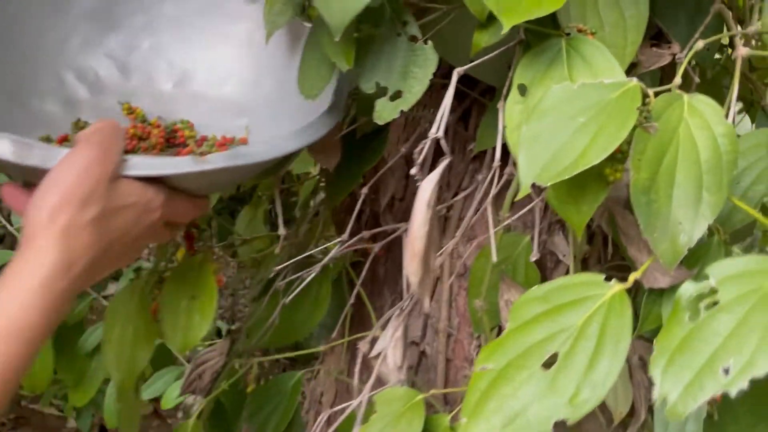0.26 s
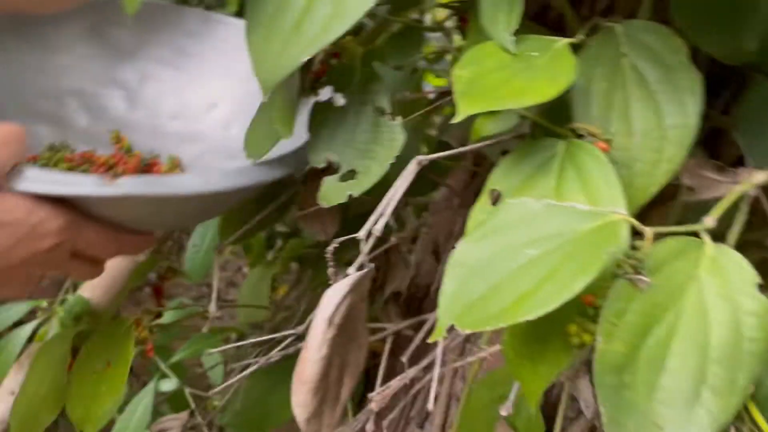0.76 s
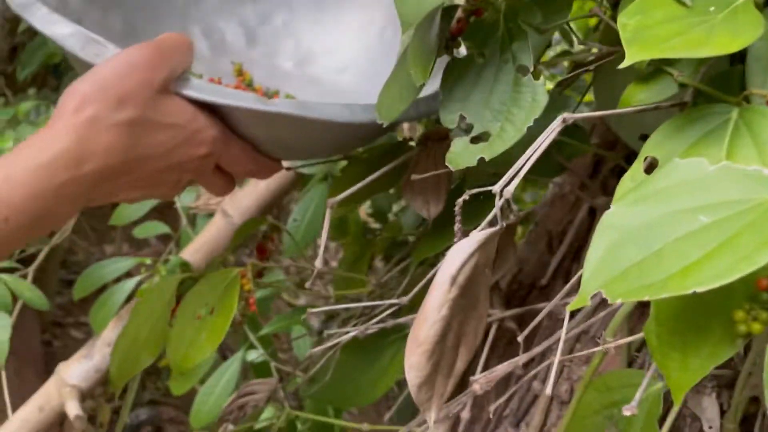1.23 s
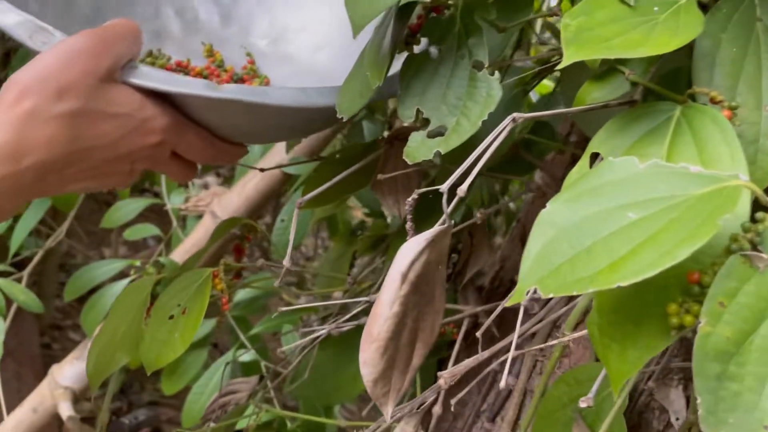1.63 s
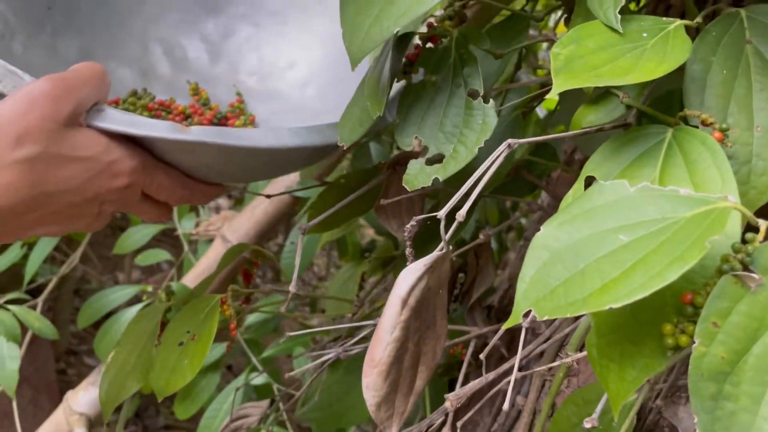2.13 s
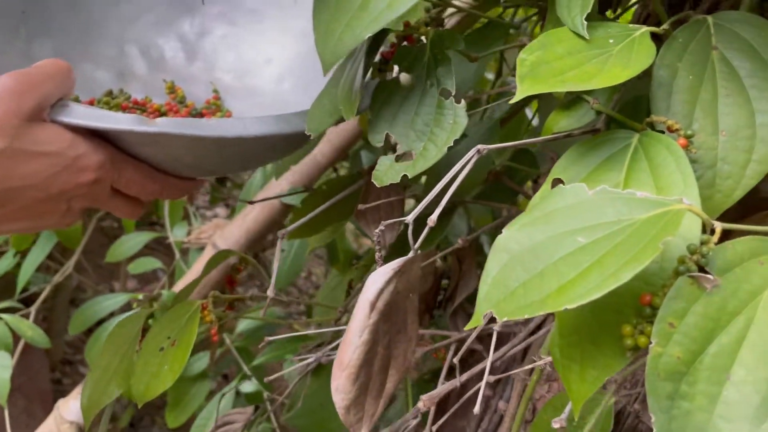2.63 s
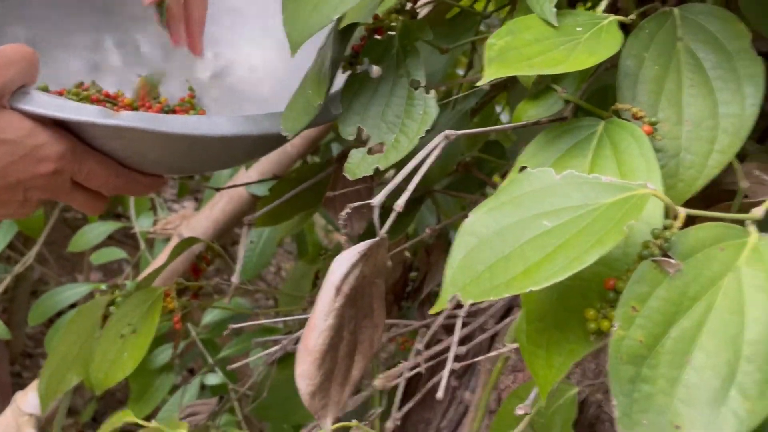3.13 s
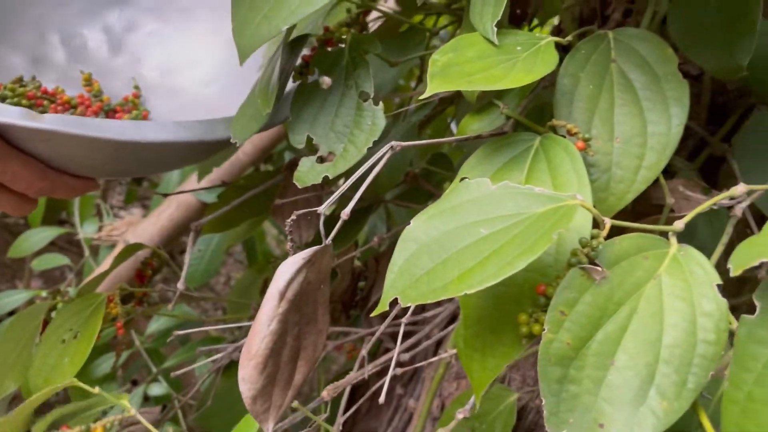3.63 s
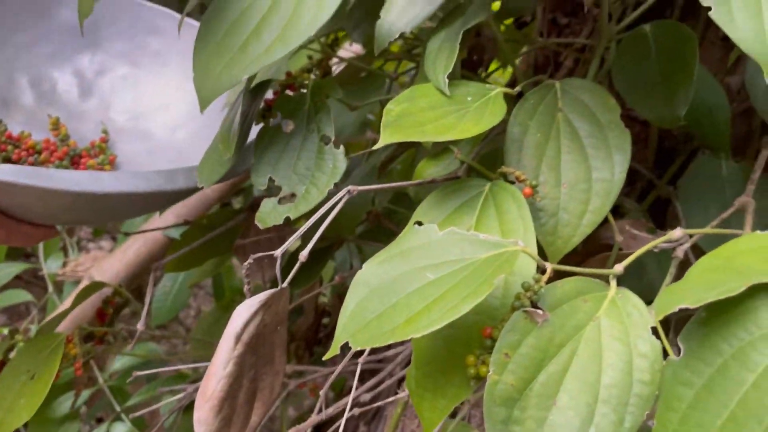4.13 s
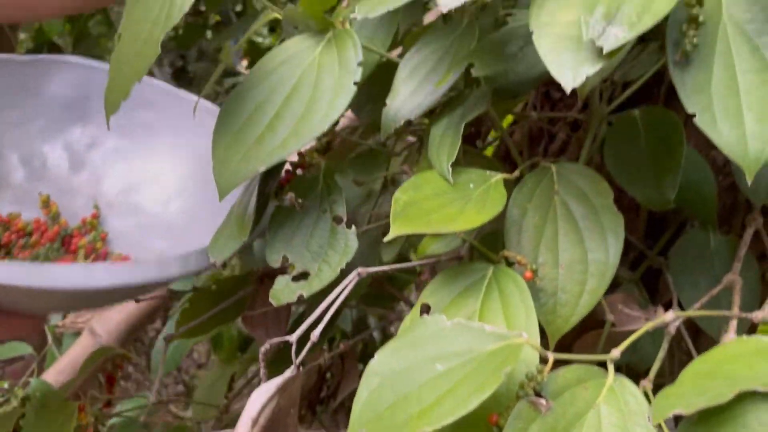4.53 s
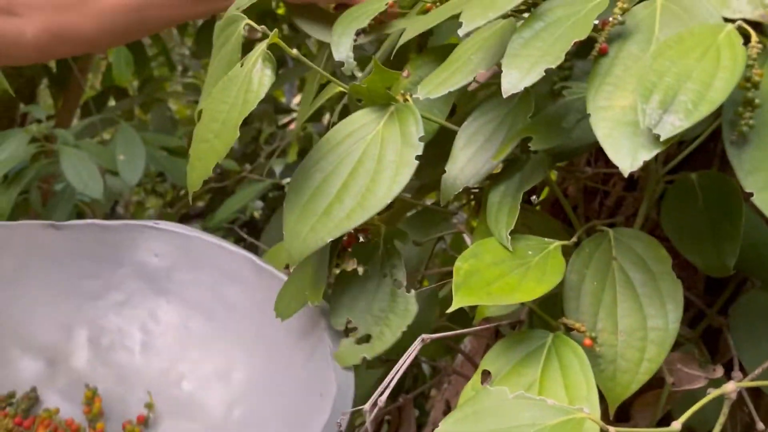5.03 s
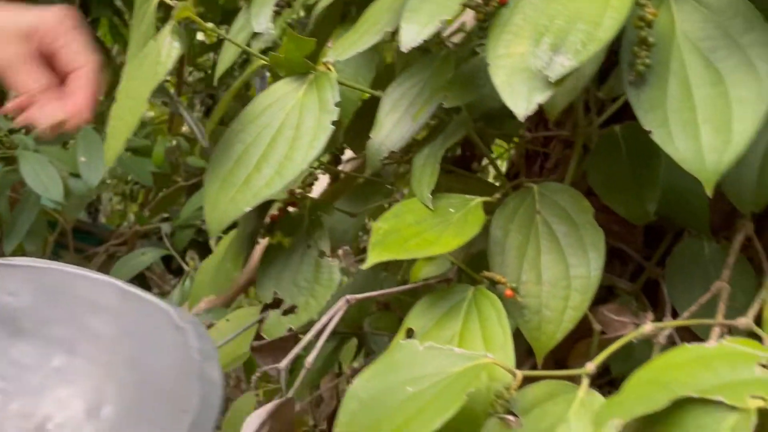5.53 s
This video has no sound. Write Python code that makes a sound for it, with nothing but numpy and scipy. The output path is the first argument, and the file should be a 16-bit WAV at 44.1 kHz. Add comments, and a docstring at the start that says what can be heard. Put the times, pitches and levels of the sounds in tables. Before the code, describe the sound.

Chicks peep constantly and a hen clucks softly in a leafy yard while stalks snap sharply and berries roll in a thin metal bowl.

```python
"""From the start chicks peep and a hen clucks (gliding near-sines and harmonic notes) in a leafy yard, over
an insect hiss and a far engine's hum (filtered noise and firing tones). Leaves rustle (noise) and berries
roll in a thin metal bowl (excited modes). From about 0.6 s stalks and twigs snap (band-filtered bursts);
a jolt thumps at 1 s and one chick calls upward at 1.7 s. The picking is densest from 2.5 to 3.3 s, then
sparser snaps follow; around 5 s the bowl is tapped and berries roll again."""
import sys
import numpy as np
from scipy import signal
from scipy.fft import rfft, irfft
from scipy.io import wavfile

SR = 44100
rng = np.random.default_rng(int(sys.argv[2]) if len(sys.argv) > 2 else 0)


def store_wav(level_fs):
    """Save 16-bit WAV to argv[1]."""
    pcm = np.round(np.clip(np.atleast_2d(level_fs), -1, 1) * 32767)
    wavfile.write(sys.argv[1], SR, pcm.T.astype(np.int16))


N = 254016


def from_db(db):
    """Level to amplitude: 20 dB is a factor of ten."""
    return 10 ** (np.asarray(db) / 20)


def rms_one(x):
    """Normalisation to unit effective value."""
    return x / np.sqrt(np.mean(x ** 2) + 1e-20)


def in_time(rows):
    """Linear interpolation: each column of a time table read at every sample."""
    s, *columns = np.transpose(rows)
    return [np.interp(np.arange(N) / SR, s, c) for c in columns]


def at_hz(points, left=None, right=None):
    """Interpolation on a logarithmic frequency axis: an (f/Hz, value) table read at every bin."""
    bin_hz = np.maximum(np.arange(N // 2 + 1) * SR / N, 1)
    table_hz, values = np.array(points).T
    return np.interp(np.log(bin_hz), np.log(table_hz), values, left, right)


def sides(pan_db):
    """Level-difference stereo: gains of left and right, half the difference each."""
    return from_db(np.array([[.5], [-.5]]) * pan_db)


def add(out, s, piece):
    """Superposition: mix a piece in at time s."""
    i = max(round(s * SR), 0)
    out[..., i:i + piece.shape[-1]] += piece[..., :max(N - i, 0)]


def drift(rate):
    """Low-passed random process of spread 1; rate is the corner of its two poles in Hz."""
    r = np.exp(-80 * np.pi * rate / SR)   # one step is 40 samples
    chance = rng.standard_normal(N // 40 + 2002)
    slow = signal.lfilter([1], [1, -2 * r, r * r], chance)[2000:]
    return np.interp(np.arange(N) / 40, np.arange(len(slow)), rms_one(slow))


# phase between the two microphone ports: f/Hz, lag of the right port/rad (negative: it leads)
PORT_PHASE = [(100, 0.3), (5700, 0.4), (6700, -.9), (7700, -2.9), (8900, -3.3), (10400, -5.4),
              (11900, -6.3), (13000, -7.2), (14000, -9.2), (16400, -9.5)]


def shift_right_port(pair):
    """Interaural-like phase difference: the right spectrum is turned against the left."""
    pair[1] *= np.exp(-1j * at_hz(PORT_PHASE))
    return pair


# coherence of the background at the two ports: f/Hz, likeness/(0-1)
COHERENCE = [(60, 1), (130, 0.96), (300, 0.012), (1400, 0.014), (3000, 0.83), (6800, 0.41), (7800, 1),
             (16000, 0.83)]


def coloured(spectrum, grain_db=0):
    """Spectral shaping of partly coherent stereo noise to rms 1; quick level grain makes it crackle."""
    mid, side = rfft(rng.standard_normal((2, N)) * from_db(grain_db * drift(137)))
    alike = np.clip(at_hz(COHERENCE), 0, 1)
    pair = np.sqrt(1 + alike) * mid + np.sqrt(1 - alike) * side * [[1], [-1]]
    pair = shift_right_port(pair)
    return rms_one(irfft(pair * from_db(at_hz(spectrum, left=-80, right=-80)), N))


# level of the hum noise: t/s, level/dB
HUM_LEVEL = [(0.0, -51.5), (3.77, -54.5), (5.76, -54.5)]
# relative spectrum of the hum noise: f/Hz, density/(dB per Hz)
HUM_SPECTRUM = [(15, -57), (32, -13), (70, 4), (102, 8), (146, 1), (211, -5), (300, -7), (390, -8.5),
                (660, -120)]


def hum():
    """Broadband low-frequency noise: the untuned part of the background hum."""
    return from_db(in_time(HUM_LEVEL)[0]) * coloured(HUM_SPECTRUM)


# far engine: t/s, firing rate f/Hz, reference level of its tones/dB
ENGINE_RUN = [(0.0, 24.22, -58), (1.0, 27.33, -52), (1.7, 28.8, -55), (2.6, 29.36, -55.5),
              (3.6, 30.64, -60.5), (4.3, 29.88, -60.5), (4.8, 28.16, -64), (5.76, 28.25, -60.5)]
# harmonics of the firing rate: multiple, relative level/dB
ENGINE_HARMONICS = [(3, -9), (4, 1.5), (5, -0.5), (6, -8), (7, -8.5), (8, -12.5)]


def engine():
    """Harmonic series on the firing rate, each tone swelling and sinking on its way over the yard."""
    hz, db = in_time(ENGINE_RUN)
    phase = 2 * np.pi * np.cumsum(hz) / SR
    out = np.zeros(N)
    for k, order_db in ENGINE_HARMONICS:
        level_db = db + order_db + 2.3 * drift(1.15)
        out += from_db(level_db) * np.sin(k * phase + rng.uniform(0, 2 * np.pi))
    return out


# relative spectrum of the insect hiss: f/Hz, density/(dB per Hz)
INSECT_SPECTRUM = [(5800, -34), (6350, -6.5), (6700, 1.5), (7100, -9), (7800, -16)]


def insects(level_db=-64):
    """Narrow-band noise: a hiss whose level wavers a little."""
    return from_db(level_db + 1.04 * drift(3.3)) * coloured(INSECT_SPECTRUM)


# relative spectrum of far chicks blurred to noise: f/Hz, density/(dB per Hz)
FLOCK_SPECTRUM = [(1600, -20), (2100, -8), (2700, -2), (3400, 0), (4400, -1), (5200, -8), (5800, -22)]


def blurred_flock(level_db=-65):
    """Superposed calls merge into noise: far chicks as a strongly fluctuating band."""
    return from_db(level_db + 7.1 * drift(8.6)) * coloured(FLOCK_SPECTRUM)


def whistle(hz, level_db, flutter_db=3, beads_db=1.5, waver_hz=72):
    """Frequency and amplitude modulation: a near sine in beads, hoarser when low, soft at both ends."""
    length = len(hz) / SR
    t = np.linspace(0, 1, len(hz)) * length
    knots = rng.standard_normal((3, 120))
    wobble, flutter, beads = (np.interp(t * rate, np.arange(120), k)
                              for k, rate in zip(knots, (300, 400, 70)))   # knots per second
    hoarse_hz = waver_hz * (3500 / hz) ** 2.3 * wobble
    phase = 2 * np.pi * np.cumsum(hz + hoarse_hz) / SR
    ends = np.minimum(1, np.minimum(1.5 * t, length - t) / .012)
    return from_db(level_db + flutter_db * flutter + beads_db * beads) * ends * np.sin(phase)


def peep(length, hz_start, hz_end, level_db, bend, swell_db=3.3):
    """Frequency glide: the pitch moves as time to the power of the bend while the level swells."""
    u = np.linspace(0, 1, max(round(length * SR), 64))
    return whistle(hz_start + (hz_end - hz_start) * u ** bend, level_db + swell_db * (u - .5))


def through_leaves(call, t60_s=.08, spray_db=0):
    """Multiple scattering: leaves add a short spray of echoes, partly shared by the two sides."""
    t = np.arange(SR // 10) / SR
    shared, *own = rng.standard_normal((3, len(t))) * from_db(-60 * t / t60_s)
    spray = shared + .5 * np.array(own)
    spray *= from_db(spray_db) / np.sqrt(np.sum(spray ** 2, axis=1, keepdims=True))
    spray[:, 0] = 1   # the direct call
    return signal.fftconvolve(call[None], spray, axes=1)


def far_chicks(count=230, level_db=-63, bend=1.2):
    """Random superposition: the rest of the brood peeps behind the leaves, at chance moments."""
    out = np.zeros((2, N))
    for when, long, high, fall, loud in rng.random((count, 5)):
        hz = 2900 + 2300 * high
        call = peep(0.04 + 0.08 * long, hz, hz * (.8 - 0.3 * fall), level_db + 9 * (loud - .5), bend)
        add(out, when * N / SR, through_leaves(call))
    return out


def yard(x, t60_s=.28, build_up_s=.02):
    """Diffuse reverberation: leaves, trunks and walls scatter a dying echo cloud, another to each side."""
    t = np.arange(SR // 2) / SR
    cloud = rng.standard_normal((2, len(t))) * from_db(-60 * t / t60_s) * np.clip(t / build_up_s, 0, 1)
    cloud /= np.sqrt(np.sum(cloud ** 2, axis=1, keepdims=True))
    return signal.fftconvolve(x, cloud, axes=1)[:, :N]


# hen notes: t/s (8 ms after the onset), level of the second partial/dB, its nominal pitch f/Hz
HEN_NOTES = [(.161, -48, 558), (0.373, -49.5, 544), (.479, -48, 546), (.619, -51.5, 538),
             (0.718, -41.5, 536), (.827, -49.5, 523), (0.964, -45.5, 453), (1.564, -48.5, 463),
             (1.659, -47.5, 501), (1.779, -46.5, 518), (1.875, -47, 535), (1.985, -44, 489),
             (2.104, -50, 474), (2.225, -49, 472), (2.328, -44, 782), (2.469, -52, 440),
             (2.754, -48.5, 669), (2.852, -49, 695), (2.88, -42, 670), (2.904, -47.5, 854),
             (2.94, -46.5, 673), (2.995, -49.5, 845), (3.03, -47, 659), (3.154, -46, 685),
             (3.405, -48, 705), (3.55, -60, 525), (3.7, -53, 537), (3.76, -56, 728), (3.874, -53, 806),
             (3.998, -46, 710), (4.647, -45.5, 754), (5.101, -47, 710), (5.67, -50, 795)]


def hen(first_db=-8, fourth_db=-14, hoarse=0.35, length=0.04, pan_db=-2):
    """Harmonic synthesis: short rounded notes drop a little; the third partial grows with pitch."""
    out = np.zeros((2, N))
    u = np.linspace(0, 1, max(round(length * SR), 64))
    for s, level_db, hz in HEN_NOTES:
        third_db = -16.5 + 21.5 * np.log2(hz / 500)   # rise in dB per octave
        phase = np.pi * np.cumsum(hz * (1.03 - 0.068 * u)) / SR   # fundamental at half the pitch
        partials_db = [first_db, 0, third_db, fourth_db]
        tone = sum(from_db(db) * np.sin(k * phase) for k, db in enumerate(partials_db, 1))
        tone *= 1 + hoarse * np.interp(u, np.linspace(0, 1, 20), rng.standard_normal(20))
        swell = np.sin(np.pi * u ** 0.95)
        add(out, s - .008, from_db(level_db) * swell * tone * sides(pan_db))
    return out


# mostly falling whistles: t/s, length/s, start f/Hz, end f/Hz, mid level/dB,
# bend (1 straight, 3 holds then drops)
CHICK_PEEPS = [(.006, 0.17, 3920, 2640, -51.5, 1.38), (0.012, 0.18, 4820, 3210, -55, 1.7),
               (.099, 0.068, 3890, 3380, -49, 1.05), (0.294, 0.12, 4500, 3860, -59, 2.4),
               (.383, 0.072, 3590, 2260, -52.5, 3.9), (.495, 0.072, 5570, 5060, -59.5, 1.36),
               (.53, 0.15, 4490, 3560, -53.5, 0.74), (.566, .06, 5040, 4350, -47.5, 1.8),
               (.613, 0.059, 4000, 3815, -47, 0.82), (.604, 0.086, 3255, 2870, -54.5, 1.34),
               (.66, 0.059, 3294, 2256, -51, 2.2), (.66, 0.1, 3547, 3205, -50, 2.6),
               (0.744, 0.037, 2720, 2500, -60, 1.4), (.82, 0.036, 3650, 3480, -52, 0.84),
               (0.374, 0.029, 3250, 2780, -56, 1.2), (0.486, 0.018, 3870, 3500, -62, 0.95),
               (.97, 0.13, 5510, 4610, -55, 1.2), (0.949, 0.2, 5030, 2510, -51, 1.84),
               (1.0, 0.14, 4340, 3640, -51, 1.3), (1.331, 0.12, 3645, 2185, -51.5, 4),
               (1.335, 0.098, 4700, 4080, -53.5, 1.4), (1.4, 0.069, 4110, 3460, -46.5, 1.06),
               (1.466, 0.094, 2580, 2127, -49, 0.87), (1.497, 0.079, 3700, 2460, -49.5, 1.73),
               (1.584, 0.073, 3910, 2520, -48.5, 1.8), (1.59, .13, 5350, 4200, -56, 1.6),
               (1.735, 0.18, 4910, 3650, -56, 1.04), (1.887, 0.14, 2230, 2023, -58, 1.34),
               (1.944, 0.045, 4780, 4030, -51.5, 0.95), (1.989, .04, 3030, 2620, -53, 1.7),
               (2.035, 0.15, 4975, 2300, -52.5, 2.4), (2.06, 0.091, 3550, 2530, -56, 2.7),
               (2.2, 0.049, 3380, 2180, -58, 2.7), (2.2, 0.11, 4256, 3785, -53, 1.53),
               (2.315, 0.063, 3770, 2580, -50, 1.16), (2.251, 0.13, 4950, 3510, -54.5, 1.55),
               (2.249, 0.17, 5340, 4310, -54.5, 2.7), (2.41, 0.086, 4440, 4000, -54, 1.3),
               (2.504, 0.034, 3150, 2940, -50, 1.3), (2.63, 0.065, 3620, 2900, -51, 1.16),
               (2.725, 0.11, 4750, 3440, -53.5, 2), (2.897, 0.1, 3306, 2793, -52.5, 0.85),
               (2.98, 0.048, 3800, 3330, -45.5, 1.08), (3.029, 0.049, 3910, 3580, -43, 1.1),
               (3.12, 0.076, 4330, 3920, -45.5, 1.16), (3.23, 0.032, 3880, 3610, -48.5, 1.2),
               (3.321, 0.087, 5000, 4300, -52.5, 1.3), (3.369, 0.04, 3120, 2960, -45.5, .7),
               (3.391, 0.07, 3855, 3190, -46.5, 0.96), (3.431, .195, 4450, 4070, -57.5, 1.2),
               (3.461, 0.083, 5390, 4220, -52, 2.24), (3.506, 0.064, 3100, 2930, -57, 1.4),
               (3.605, 0.046, 3820, 2890, -52, 1.7), (3.657, 0.052, 3670, 2400, -55, 1.44),
               (3.744, 0.12, 5055, 3860, -49, 2.16), (3.84, 0.084, 3890, 3360, -43.5, 1.8),
               (3.838, 0.12, 3666, 2450, -48, 1.3), (4.135, 0.044, 3076, 2790, -54.5, 1.7),
               (4.2, 0.14, 5280, 3190, -53, 2.2), (4.312, 0.04, 3610, 3470, -48, 0.98),
               (0.0, 0.1, 5080, 4540, -56, 1.7), (4.406, 0.036, 3280, 2290, -48.5, 2.1),
               (4.45, 0.16, 4700, 3720, -56, 1.05), (4.611, 0.075, 5080, 4000, -49.5, 1.7),
               (4.655, 0.054, 3166, 2796, -48, 1.47), (4.685, 0.064, 3800, 2670, -48.5, 1.86),
               (4.744, 0.12, 4660, 4180, -57.5, 1.5), (4.84, 0.12, 5590, 4690, -56, 0.5),
               (4.91, .09, 4380, 4330, -58, 1.2), (4.864, 0.034, 3076, 2710, -50.5, 1),
               (4.98, 0.071, 3290, 2790, -51, 1.44), (5.115, 0.04, 3920, 2840, -47, 1.3),
               (5.15, 0.053, 4910, 4390, -53, 1.1), (5.201, 0.087, 4043, 3200, -52.5, 1.9),
               (5.249, 0.044, 5460, 5400, -51, 1.3), (5.345, 0.04, 4300, 2310, -49, 0.68),
               (5.415, 0.047, 3720, 3570, -61, 1.4), (5.44, 0.091, 4500, 3680, -50.5, 4.1),
               (5.529, 0.081, 4640, 4760, -51.5, .6), (5.59, 0.047, 4430, 3900, -51.5, 1.4),
               (5.55, 0.036, 3410, 2770, -46, 1.25), (5.635, 0.064, 4240, 2640, -52.5, 1.14),
               (5.684, 0.073, 5570, 5300, -54, 1.1)]
# pitch line of one chick calling upward: t/s, f/Hz, level/dB
UPWARD_CALL = [(1.67, 2043, -53), (1.75, 2793, -48.5), (1.84, 2875, -50.5), (1.92, 2594, -43.5)]


def chicks(spread_db=3.5):
    """Directional cue by level: the brood tends to the left, its high voices more so."""
    out = np.zeros((2, N))
    for s, length, hz, *shape in CHICK_PEEPS:
        pan_db = 1.9 + 2.7 * np.log2(hz / 4000) + spread_db * rng.standard_normal()
        add(out, s, through_leaves(peep(length, hz, *shape)) * sides(pan_db))
    start, end = round(UPWARD_CALL[0][0] * SR), round(UPWARD_CALL[-1][0] * SR)
    hz, level_db = (c[start:end] for c in in_time(UPWARD_CALL))
    add(out, start / SR, through_leaves(whistle(hz, level_db)) * sides(1.2))
    return out


def bump(start_s=0.99, level_db=-30, hz=94, t60_s=0.041):
    """Damped oscillation: a hand jolts the microphone, one dull thump in both ports."""
    t = np.maximum(np.arange(N) / SR - start_s, 0)
    return from_db(level_db - 60 * t / t60_s) * np.sin(2 * np.pi * hz * t)


def patchy(x, patch_db=3.8, rate=13.0):
    """Band-wise modulation: overlapping octave bands, the ends open, swell and sink on their own."""
    spectrum = rfft(x)
    octave = np.log2(np.maximum(np.arange(N // 2 + 1) * SR / N, 250) / 250)   # 0 up to 250 Hz
    out = 0
    for k in range(4):
        share = np.clip(1 - np.abs(np.minimum(octave, 3) - k), 0, 1)
        out = out + from_db(patch_db * drift(rate)) * irfft(spectrum * share, N)
    return rms_one(out)


# course of the rustling: t/s, dull shuffle level/dB, crisp hiss level/dB
RUSTLE_LEVELS = [(0.0, -50, -54), (.38, -59.5, -63), (1.09, -53, -60), (1.39, -53.5, -66.5),
                 (1.6, -53.5, -58.5), (2.17, -61, -59), (2.31, -54.5, -58.5), (2.55, -55, -53),
                 (2.8, -50.5, -59.5), (2.87, -46, -54.5), (3.05, -55, -56.5), (3.2, -55, -55),
                 (3.42, -53.5, -67), (3.67, -61, -64.5), (3.93, -50, -53.5), (4.15, -56, -62.5),
                 (4.64, -52, -54.5), (4.86, -58, -61.5), (5.13, -46.5, -51), (5.45, -61.5, -64.5),
                 (5.76, -60, -69)]
# relative spectra of the two layers: f/Hz, density/(dB per Hz)
SHUFFLE_SPECTRUM = [(150, -7), (350, -2), (700, -2), (1300, -5), (2000, -9), (3500, -24)]
CRISP_SPECTRUM = [(3000, 2.5), (5500, 0), (8000, -2.5), (11000, -6.5), (13700, -15)]


def leaves():
    """Friction noise: a patchy dull shuffle and a crisp hiss, both grainy."""
    shuffle_db, crisp_db = in_time(RUSTLE_LEVELS)
    shuffle = patchy(coloured(SHUFFLE_SPECTRUM, grain_db=2.5))
    crisp = coloured(CRISP_SPECTRUM, grain_db=1.5)
    return from_db(shuffle_db + 2.0 * drift(6.0)) * shuffle + from_db(crisp_db + 2.4 * drift(7.5)) * crisp


# taps on the bowl: t/s, level of a mode at the favoured pitch/dB, pitch that the spot favours f/Hz
BOWL_TAPS = [(0.1855, -42.5, 1110), (1.349, -36.5, 1005), (4.768, -42, 1206), (4.9527, -45, 1250)]
# modes of the bowl: f/Hz, relative level under rolling/dB, t60 after a tap/s
BOWL_MODES = [(835, -33, 0.12), (1016, 0.5, 0.2), (1130, 13, 0.18), (1232, 9, 0.26), (1460, -18, 0.23)]
# berries rolling in the bowl: t/s, length/s, relative drive level/dB
BERRY_ROLLS = [(0.0, 0.16, -65), (0.318, 0.1, -72), (0.585, 0.23, -70), (2.217, 0.254, -67.5),
               (5.064, 0.22, -71)]


def bowl(rolling_t60=0.5, edge_s=0.023, tap_loss_db=41):
    """Modal excitation: taps and rolling berries ring thin metal; berries lying in it shorten their ring."""
    tap_s, tap_db, tap_hz = np.array(BOWL_TAPS).T
    patter, out = np.zeros(N), np.zeros((2, N))
    for s, length, db in BERRY_ROLLS:
        t = np.arange(N) / SR - s
        patter += from_db(db) * np.clip(np.minimum(t + edge_s, length - t) / edge_s, 0, 1)
    for hz, db, t60 in BOWL_MODES:
        clicks = np.zeros(N)
        loss_db = tap_loss_db * np.abs(np.log2(hz / tap_hz))   # tap_loss_db is per octave of distance
        clicks[(tap_s * SR).astype(int)] = from_db(tap_db - loss_db - db)   # db returns below
        noise = rng.standard_normal(N) + rng.standard_normal((2, N))   # shared and own to each side
        rain = patter * noise * from_db(5.7 * drift(50.0))
        for drive, t60_s in (clicks, t60), (rain * 0.04, t60 * rolling_t60):
            r, w = from_db(-60 / (t60_s * SR)), 2 * np.pi * hz / SR
            ring = signal.lfilter([0, np.sin(w)], [1, -2 * r * np.cos(w), r * r], drive + 1e-18)
            out += from_db(db) * ring * sides(rng.normal(0, 5))
    return out


# snaps: t/s, peak level of the ring/dB, pitch of the twig's ring f/Hz,
# knock against the ring/dB, treble crack against the ring/dB, t60 of ring and knock/s (at least 5 ms)
TWIG_SNAPS = [(0.562, -41.5, 2220, -13, -3, 0.025), (0.9591, -30.5, 2500, 6, 5.5, 0.07),
              (0.673, -37, 3500, 1.5, -8, 0.043), (1.044, -33, 2640, -4, -11, 0.022),
              (1.3407, -37.5, 1030, 2.5, -32, 0.1), (1.458, -32, 5240, -8, -4.5, 0.17),
              (2.322, -45, 2640, 9, -20, 0.038), (2.3576, -41, 3470, 3.5, 2, 0.078),
              (2.4652, -33.5, 2300, -1.5, 1, 0.0097), (2.533, -30, 2486, -16, 5, 0.025),
              (2.542, -24, 1680, -39, 3.5, 0.068), (2.5452, -23.5, 2520, 1.5, -3, 0.044),
              (2.5602, -27.5, 6700, -0.5, 2, 0.056), (2.574, -36.5, 6400, 0, 0, 0.25),
              (2.5954, -40.5, 6900, 4, 9, 0.18), (2.612, -42, 2600, 0, 0, 0.058),
              (2.627, -44, 2300, 8, 7, 0.05), (2.832, -52, 940, 18, -22, 0.35),
              (2.9556, -10.5, 6540, -21.5, -35, 0.064), (2.9565, -10.5, 4350, -24, -11, 0.018),
              (3.0741, -21.5, 3150, -11, -9, 0.13), (3.079, -17, 5400, -15, -19, 0.062),
              (3.222, -17.5, 5120, -17, -17, 0.036), (3.314, -26.5, 4530, -16, -8, 0.089),
              (4.0329, -44, 2580, -14, 14, 0.08), (4.599, -35.5, 3240, -10, 3, 0.11),
              (4.7296, -37, 3850, -10, 1, 0.34), (4.7717, -46, 1200, 11, -26, 0.11),
              (4.948, -53.5, 1400, 15, -6, 1), (5.0734, -27.5, 1750, 7, 0, 0.021),
              (5.1424, -32.5, 2670, 2.5, 3.5, 0.19), (5.2125, -41, 1890, 3, -14, 0.12)]
# level difference of the snaps: f/Hz, left minus right/dB
SNAP_BALANCE = [(1000, 3), (4000, 2), (7000, 9.5), (9000, -2), (16000, 0)]


def snaps(jagged_db=2.5, ring_width=.45, crack_t60_share=.6, first_t60_s=0.0087, first_db=-9.5):
    """Brittle fracture: fibres break in a quick dying run that rings the twig, knocks and cracks."""
    out, t = np.zeros(N), np.arange(6000) / SR
    # the first fibre breaks hardest
    first = from_db(first_db - 60 * t / first_t60_s)
    for s, peak_db, hz, knock_db, crack_db, t60 in TWIG_SNAPS:
        steps = np.repeat(from_db(jagged_db * rng.standard_normal(len(t) // 24)), 24)
        cracks = rng.standard_normal(len(t)) * steps
        ring_band = hz * (1 + ring_width) ** np.array([-.5, .5])
        parts = ((0, ring_band, 1), (knock_db, (300, 3500), 1),
                 (crack_db, (5000, 16300), crack_t60_share))   # the crack dies sooner
        for db, band, share in parts:
            dying = from_db(-60 * t / max(share * t60, .005)) + first
            band_filter = signal.butter(3, band, "band", fs=SR, output="sos")
            part = signal.sosfilt(band_filter, cracks * dying)
            add(out, s, from_db(peak_db + db) * part / np.abs(part).max())
    return irfft(shift_right_port(rfft(out) * sides(at_hz(SNAP_BALANCE))), N)


def scene():
    """Direct and reverberant field: birds with echoes, near hand sounds almost dry, steady background."""
    background = hum() + engine() + insects() + blurred_flock()
    brood, clucks, peeps = far_chicks(), hen(), chicks()
    near = bowl() + snaps()
    echoes = yard(from_db(-5) * peeps + brood + from_db(-4.5) * clucks + from_db(-26) * near)
    birds = from_db(-1) * brood + clucks + peeps
    return background + birds + echoes + bump() + leaves() + near


def record(dry):
    """Low-pass filtering: a steep filter removes the top, its stopband from 16.9 kHz."""
    return signal.sosfilt(signal.cheby2(12, 70, 16900, fs=SR, output="sos"), dry)


dry = scene()
out = record(dry)
store_wav(out)
```